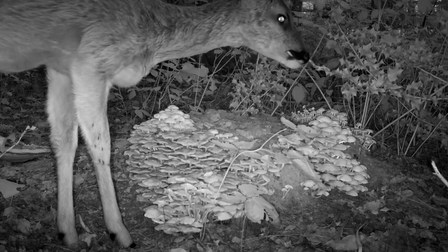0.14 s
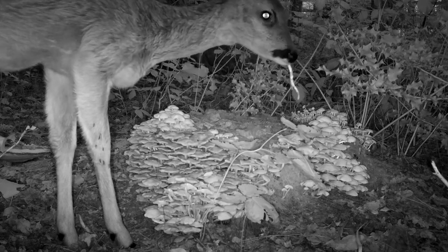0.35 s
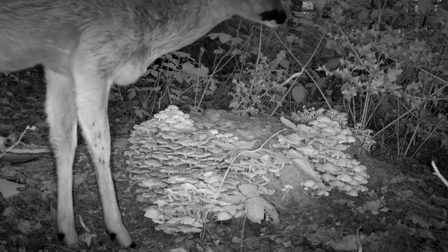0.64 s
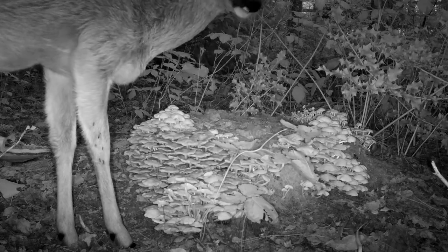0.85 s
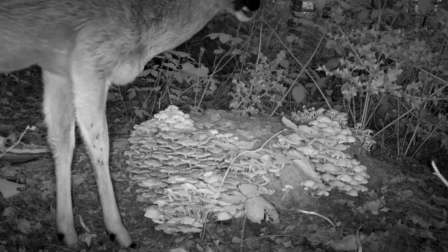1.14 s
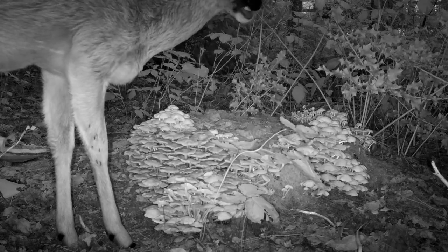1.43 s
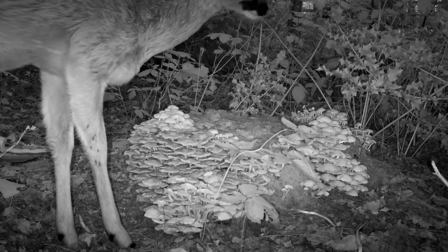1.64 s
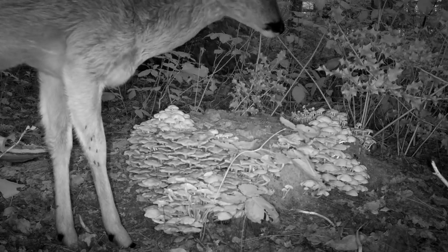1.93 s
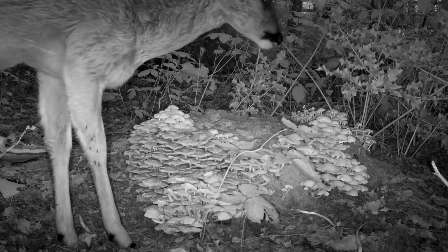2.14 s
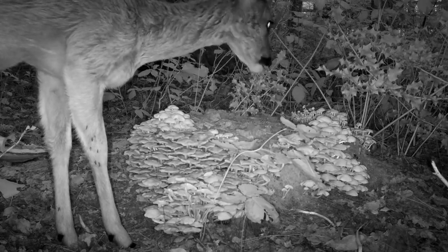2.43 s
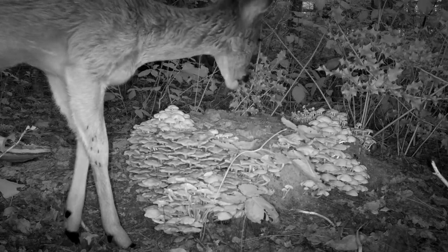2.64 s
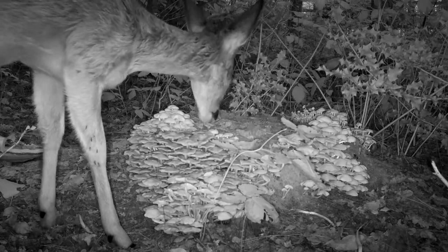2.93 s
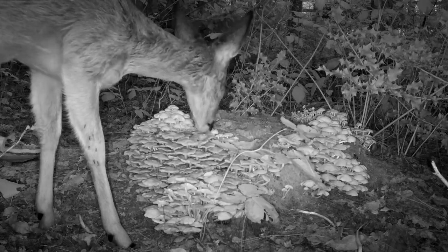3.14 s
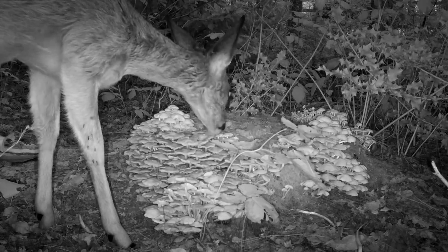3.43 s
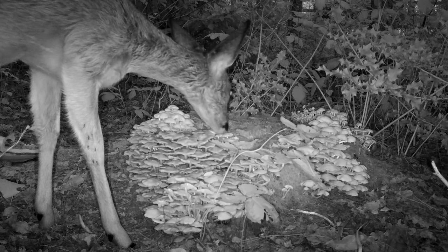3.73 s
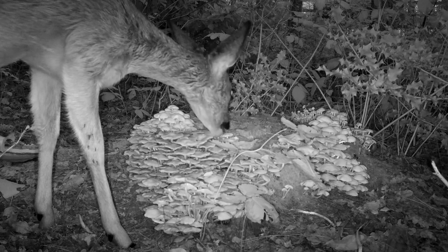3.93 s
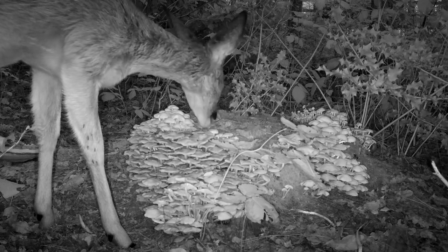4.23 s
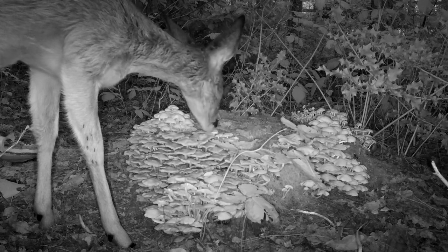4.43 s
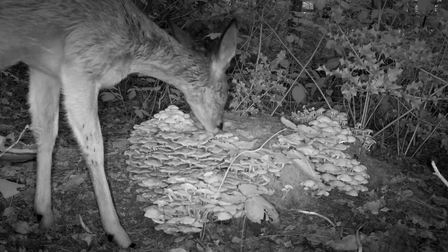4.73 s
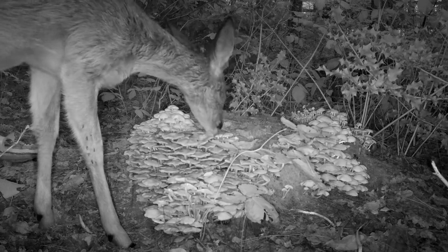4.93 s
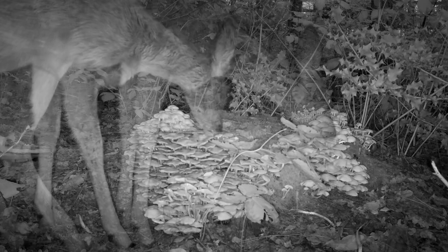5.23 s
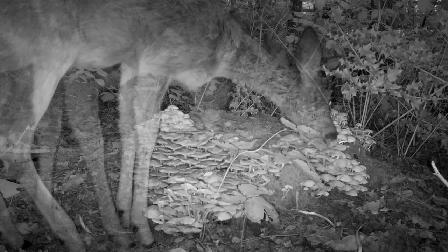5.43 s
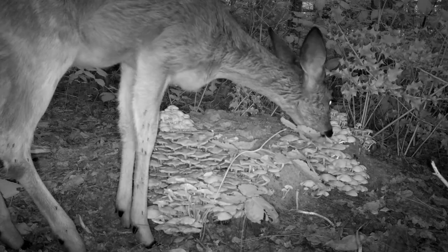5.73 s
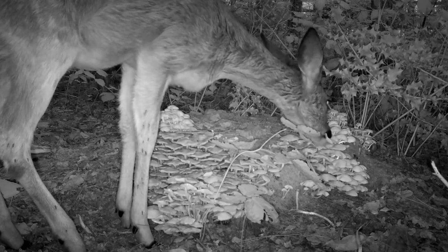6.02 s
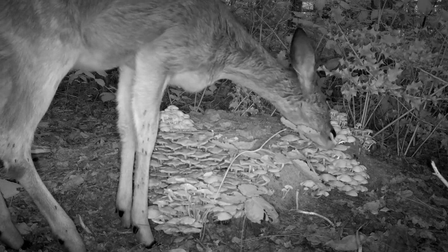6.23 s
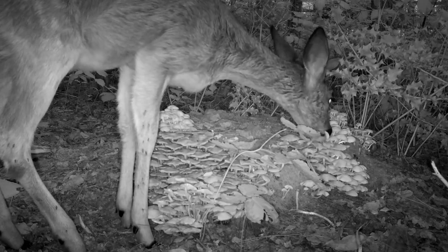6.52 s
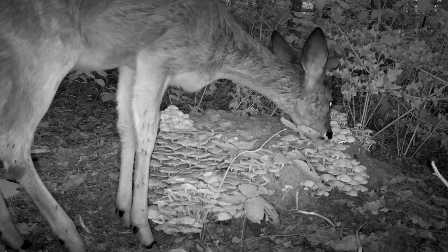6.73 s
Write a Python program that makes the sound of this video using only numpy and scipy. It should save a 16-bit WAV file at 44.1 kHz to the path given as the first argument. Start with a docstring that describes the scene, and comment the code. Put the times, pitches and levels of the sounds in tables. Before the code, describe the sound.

A small animal rattles shrilly, then a deer crunches and snaps stalks in a forest, with faint squeaks over steady hiss.

```python
"""A forest at night, where a young deer feeds on mushrooms in front of a trail camera.
Its bites and steps snap and rustle: stalks, twigs and leaves break in runs of tiny cracks.
A small animal, perhaps a squirrel, scolds in a rattle of falling chips; squeaks and thin peeps,
perhaps a bird's, come mostly later. The trees scatter the chips and squeaks.
Under it all lie the camera's own hiss, hum and thin whine."""
import sys
import numpy as np
from scipy import signal
from scipy.fft import rfft, irfft, next_fast_len
from scipy.io import wavfile
from scipy.ndimage import uniform_filter1d

SR = 44100
rng = np.random.default_rng(int(sys.argv[2]) if len(sys.argv) > 2 else 0)


def master_out(mix):
    """Clip the mix to full scale and print it as 16-bit PCM to the path in sys.argv[1]."""
    frames = np.transpose(np.atleast_2d(mix))
    ceiling = np.clip(frames, -1, 1)
    pcm = np.round(ceiling * 32767).astype(np.int16)
    wavfile.write(sys.argv[1], SR, pcm)


N = 302526
TIME = np.arange(N) / SR


def amp(db):
    """Decibels to gain."""
    return 10 ** (np.asarray(db) / 20)


def unit(x):
    """Scale to rms 1."""
    return x / np.sqrt(np.mean(x ** 2) + 1e-20)


def lookup(points, x):
    """Interpolate a table on a linear axis."""
    return np.interp(x, *np.transpose(points))


def lookup_hz(points, hz):
    """Interpolate a table on a log frequency axis."""
    f, value = np.transpose(points)
    return np.interp(np.log(hz + 1), np.log(f + 1), value)


def add(mix, start_s, sound):
    """Mix a sound in at start_s."""
    start = round(start_s * SR)
    sound = sound[max(-start, 0):]
    part = mix[max(start, 0):][:len(sound)]
    part += sound[:len(part)]


def wander(size, hz):
    """Smooth random curve, rms 1, bandwidth about hz."""
    f = np.fft.rfftfreq(size, 1 / SR)
    return unit(irfft(rfft(rng.standard_normal(size)) * np.exp(-(f / hz) ** 2), size))


def coloured(x, spectrum, treble_db=0, ring_hz=1, ring_db=0, ring_octaves=.19):
    """Minimum-phase filter: spectrum, treble shelf and one resonance."""
    hz = np.fft.rfftfreq(1024, 1 / SR)
    db = lookup_hz(spectrum, hz) + treble_db * np.clip((hz - 5000) / 4000, 0, 1)
    db += ring_db * np.exp(-(np.log2((hz + 1) / ring_hz) / ring_octaves) ** 2)
    log_gain = np.log(amp(np.r_[db, db[-2:0:-1]]))
    response = np.fft.ifft(np.exp(np.conj(signal.hilbert(log_gain)))).real
    return signal.fftconvolve(x, response)


def noise(spectrum, patchy_db, size=1024, patch_s=.11, patch_hz=260):
    """Shaped noise, rms 1; its level drifts by patchy_db in time-frequency patches."""
    hz = np.fft.rfftfreq(size, 1 / SR)
    hop = size // 4
    real, imag, patches = rng.standard_normal((N // hop + 6, len(hz), 3)).T
    patches = uniform_filter1d(patches, size=round(patch_s * SR / hop), axis=1)
    patches = unit(uniform_filter1d(patches, size=round(patch_hz / hz[1]), axis=0))
    depth_db = np.interp(np.arange(real.shape[1]) * hop / SR, TIME, patchy_db * np.ones(N))
    bins = (real + 1j * imag) * amp(lookup_hz(spectrum, hz)[:, None] + depth_db * patches)
    return unit(signal.istft(bins, nperseg=size, noverlap=size - hop)[1][:N])


def hiss():
    """Camera hiss; near 4.8 s it drops, dulls and swirls more."""
    # freq_hz, density_db
    spectrum = [(200, -52), (450, -47), (650, -18.5), (900, -18.5), (1250, -1), (1850, 4), (2700, -1.5),
                (3200, -8.5), (4000, -15), (4900, -20.5), (6000, -33), (7200, -43.5), (10000, -46.5),
                (15500, -39)]
    # time_s, gain_db
    gain_db = [(0, 2), (4.815, -0.5), (4.829, -10), (4.9, -5), (5.01, -9), (5.07, -4), (6.7, -4.5),
               (6.86, -10.5)]
    # time_s, gain_db
    treble_db = [(4.81, 8.5), (4.84, -3.5), (5.02, 2.5), (5.07, 3)]
    # time_s, depth_db
    swirl_db = [(4.8, .8), (4.85, 2.7)]
    base = noise(spectrum, patchy_db=lookup(swirl_db, TIME))
    treble = signal.sosfiltfilt(signal.butter(4, 3000, "high", fs=SR, output="sos"), base)
    shelved = base + (amp(lookup(treble_db, TIME)) - 1) * treble
    return amp(-55.5 + lookup(gain_db, TIME)) * shelved


def electronics(frame_hz=29.7, whine_hz=7797):
    """Camera fizz, rumble, hum and a whine that flips over with every picture taken."""
    # freq_hz, density_db
    fizz_spectrum = [(1000, -18.5), (5000, 5.5), (15500, 6)]
    # freq_hz, density_db
    rumble_spectrum = [(15, -6.5), (40, -0.5), (80, -1.5), (170, -2), (240, -7.5), (330, -19), (500, -24),
                       (1000, -59)]
    fizz = amp(-91) * noise(fizz_spectrum, patchy_db=0)
    rumble_db = np.interp(TIME, [2.5, 5], [-74.3, -76])
    rumble = amp(rumble_db) * noise(rumble_spectrum, patchy_db=.5, size=4096)
    hum = amp(-78.5) * np.sin(2 * np.pi * 2 * frame_hz * TIME)
    flip = .37 + np.tanh(9 * np.sin(2 * np.pi * frame_hz * TIME))
    whine_gain = amp(np.interp(TIME, [4, 4.9, 5.25], [-74, -79, -89]))
    whine = whine_gain * flip * np.sin(2 * np.pi * whine_hz * TIME)
    return fizz + rumble + hum + whine


def swirling_hiss():
    """Faint, patchy, swirling camera hiss from about 5 s on."""
    # freq_hz, density_db
    spectrum = [(600, -38), (1400, -6.5), (2200, 4.5), (4000, -10), (5500, -22), (7500, -32.5),
                (15000, -43)]
    # time_s, level_db
    level_db = [(5.0, -83), (5.08, -63.5), (6.8, -66.5)]
    return amp(lookup(level_db, TIME)) * noise(spectrum, patchy_db=3)


def forest(x, near_db, far_db):
    """Ground and near trunks reflect at once; farther trees leave a thin tail."""
    # freq_hz, t60_s
    t60_s = [(1800, 0.33), (2800, 0.47), (4500, 0.75), (7000, 0.53), (12000, 0.27)]
    t = np.arange(SR) / SR
    far = rng.standard_normal(SR) * (rng.random(SR) < 2500 / SR) * np.clip(t / .0044, 0, 1)
    hz, delay_s, bins = signal.stft(far, SR, nperseg=256)
    decay = amp(-60 * delay_s / lookup_hz(t60_s, hz)[:, None])
    far = signal.istft(bins * decay, SR, nperseg=256)[1][:SR]
    near = rng.choice([-1., 1.], SR) * (rng.random(SR) < 900 / SR) * np.exp(-t / .009) * (t > .002)
    echoes = amp(near_db) * near / np.linalg.norm(near) + amp(far_db) * far / np.linalg.norm(far)
    return signal.fftconvolve(x, echoes)[:N]


def scatter(x, near_db, far_db, blur_hz, count=6):
    """An even wash: several paths through the trees, each shifted a little in pitch."""
    analytic = signal.hilbert(x, next_fast_len(N))[:N]
    shifts_hz = np.linspace(-blur_hz, blur_hz, count)
    paths = [(analytic * np.exp(2j * np.pi * hz * TIME)).real for hz in shifts_hz]
    return sum(forest(path, near_db, far_db) for path in paths) / np.sqrt(count)


def sizzle(calls):
    """Faint treble noise that follows the shrillest part of the calls."""
    # freq_hz, density_db
    spectrum = [(4000, -37), (7000, 0), (9000, -8), (10500, -1), (12000, -13), (14000, -22.5), (15500, -13)]
    shrill = signal.sosfilt(signal.butter(4, 3700, "high", fs=SR, output="sos"), calls)
    shrill_rms = np.sqrt(abs(uniform_filter1d(shrill ** 2, size=2000)))
    return amp(-37) * shrill_rms * noise(spectrum, patchy_db=1.5)


def voice(hz, rough, overtone_db):
    """Tone with one overtone; roughness shakes its pitch and strength."""
    phase = 2 * np.pi * np.cumsum(hz * (1 + .064 * rough * wander(len(hz), 590))) / SR
    tone = np.sin(phase) + amp(overtone_db) * np.sin(2 * phase)
    return unit(tone * (1 + rough * np.tanh(wander(len(hz), 450))))


def whistles(notes, roughness, taper, bend):
    """Short gliding tones; bend < 1 glides early, taper is the share spent swelling and fading."""
    out = np.zeros(N)
    for start_s, length_s, first_hz, last_hz, level_db in notes:
        progress = np.linspace(0, 1, round(length_s * SR))
        hz = first_hz + (last_hz - first_hz) * progress ** bend
        tone = voice(hz, lookup_hz(roughness, last_hz), overtone_db=-50)
        add(out, start_s, amp(level_db) * signal.windows.tukey(len(hz), taper) * tone)
    return out


def peeps():
    """Thin whistles, most of them distant; the first is a faint high tone that rides with the chips near 0.7 s.
    The highest are the purest."""
    # start_s, length_s, first_hz, last_hz, level_db
    notes = [(.7, 0.056, 4670, 4730, -57.5), (3.36, .095, 7200, 7150, -83.5), (3.66, .095, 7230, 7200, -81),
             (3.685, 0.099, 3650, 4010, -56), (3.89, .095, 7120, 7080, -79),
             (3.9, 0.096, 3986, 3900, -53.5), (4.24, 0.1, 2610, 2440, -51), (4.35, 0.12, 2550, 2600, -58),
             (6.1, 0.14, 3700, 3730, -70), (6.725, 0.1, 3720, 3760, -62)]
    # pitch_hz, roughness
    roughness = [(2600, 0.6), (4000, 0.42), (7000, 0.06)]
    return whistles(notes, roughness, taper=.53, bend=2.1)


def squeaks():
    """Brief squeaks that spill into the trees; the highest are the most strained."""
    # start_s, length_s, first_hz, last_hz, level_db
    notes = [(0, 0.026, 4350, 4230, -25.5), (.066, .012, 4650, 4156, -27.5), (.117, .022, 4416, 4405, -27),
             (.242, 0.013, 5130, 3880, -25), (1.229, .011, 3760, 3500, -50),
             (3.943, 0.018, 4140, 3710, -48.5), (4.12, 0.037, 3770, 3440, -49.5),
             (4.1745, 0.016, 3910, 3780, -35.5), (4.2, .016, 3790, 3870, -43.5),
             (4.233, .023, 3980, 3350, -39.5), (4.282, .0266, 3580, 3090, -44.5),
             (4.335, 0.015, 3110, 2980, -43)]
    # pitch_hz, roughness
    strain = [(3000, 0.54), (3800, 0.16), (4300, 0.76)]
    # time_s, echo_send_db
    spill_db = [(.1, -.5), (4.18, -5.5), (4.28, -3)]
    direct = whistles(notes, strain, taper=.2, bend=.5)
    spill = direct * amp(lookup(spill_db, TIME))
    return direct + scatter(spill, near_db=-5.5, far_db=-2.5, blur_hz=140.1)


def rattle(land_hz=1785.6, crest_width_s=.001994):
    """Chips hook over a pitch crest and swell as they plunge; trees scatter them."""
    # crest_s, crest_hz, fall_s, gain_db
    chips = [(-.001, 3000, 0.013, -21.5), (0.067, 4000, .015, -25.5), (.122, 2904, 0.016, -25.5),
             (.194, 4100, .015, -25), (.247, 3100, .015, -24), (.332, 3108, .012, -25.5),
             (.395, 3465, .014, -20.5), (0.455, 3660, .012, -22.5), (.534, 2767, .012, -21),
             (.613, 2713, 0.01, -24.5), (.727, 2610, .013, -32.5), (0.796, 2800, 0.012, -27.5),
             (.883, 2750, 0.013, -22.5), (0.9858, 2590, .015, -20), (1.244, 2350, 0.013, -38.5)]
    # Chips get shorter and purer as the caller tires. time_s, half_length_s
    half_s = [(.25, 0.0092), (.46, 0.0054), (.56, 0.0043)]
    # time_s, overtone_db
    overtone_db = [(.13, -13), (.4, -28), (.8, -38)]
    # Bright near 5 kHz, dull above. freq_hz, gain_db
    chip_colour = [(500, -35), (1150, -31.5), (1650, -4), (2400, -2), (4600, 4.5), (5400, 3.5), (6400, -7),
                   (7500, -44.5), (12000, -50)]
    # time_s, echo_send_db
    spill_db = [(.6, 0), (1.0, -7.5)]
    out = np.zeros(N)
    for crest_s, crest_hz, fall_s, gain_db in chips:
        t = np.arange(-fall_s, 1.3 * fall_s, 1 / SR)
        arc_s = np.hypot(t, crest_width_s) - crest_width_s
        fallen = arc_s / (np.hypot(fall_s, crest_width_s) - crest_width_s)
        hz = crest_hz * (land_hz / crest_hz) ** fallen
        from_peak = t / lookup(half_s, crest_s) - 1.07
        swell = (1 + from_peak ** 2 / 2) ** -2 * signal.windows.tukey(len(t), .3)
        chip = voice(hz, rough=.28, overtone_db=lookup(overtone_db, crest_s))
        rasp = amp(-13) * chip * wander(len(t), 750)  # the uneven voice smears each sweep
        add(out, crest_s - fall_s, amp(gain_db) * swell * (chip + rasp))
    direct = coloured(out, chip_colour)[:N]
    spill = direct * amp(lookup(spill_db, TIME))
    return direct + scatter(spill, near_db=-5.5, far_db=-5, blur_hz=239.5)


def rustle(peak_s, half_s, level_db, treble_db, crisp_hz, cracks_per_s=3500):
    """Tearing: a swarm of tiny cracks swells and fades. Returns start_s, sound."""
    # freq_hz, gain_db
    spectrum = [(300, -59), (1200, -26.5), (1900, 2.5), (4400, 0.5), (5500, -4.5), (7800, -35),
                (9600, -9.5), (11000, -14.5), (12500, -33)]
    from_peak = np.arange(-3 * half_s, 3 * half_s, 1 / SR) / half_s
    size = len(from_peak)
    grains = rng.standard_normal(size) * (rng.random(size) < cracks_per_s / SR)
    swarm = unit(coloured(grains, spectrum, treble_db, crisp_hz, ring_db=7)[:size])
    return peak_s - 3 * half_s, amp(level_db) * swarm * np.exp(-abs(from_peak) ** 1.3)


def crack(treble_db, ring_hz, ring_db):
    """One fibre breaks: a click and a short splintering, peak 1."""
    # freq_hz, gain_db
    spectrum = [(300, -50), (1100, -47.5), (1700, -0.5), (3000, 0), (4500, 0), (5900, -8), (7700, -30),
                (10500, -21.5), (13000, -36), (15500, -52)]
    t = np.arange(SR // 50) / SR
    fracture = .36 * rng.standard_normal(len(t)) * np.exp(-t / .0008)
    fracture[0] = 1
    sound = coloured(fracture, spectrum, treble_db, ring_hz, ring_db)
    return sound / abs(sound).max()


def deer(splinter_gap_s=.0029):
    """Stalks and twigs snap in three ever weaker cracks, tearing nearby fibres; leaves rustle."""
    # start_s, peak_db, treble_db, ring_hz
    snaps = [(.543, -27, -12, 4500), (1.15, -43, -3, 4800), (2.776, -38.5, -12, 4350),
             (3.0718, -29, -6, 3300), (3.088, -19, 2, 3600), (3.0922, -25.5, 4, 3400),
             (3.197, -39.5, 6, 4040), (6.509, -43, -8.5, 4200), (6.529, -34.5, -7, 4340),
             (6.5391, -32, -12, 4370), (6.579, -34, -14, 3900), (6.584, -28, -6, 5240),
             (6.5985, -26, -18, 3230), (6.605, -19, -11, 4630), (6.608, -31, -16, 2570)]
    # Thin stalks ring more clearly than thick ones. peak_db, ring_db
    ring_db = [(-34.5, 11), (-24, 1)]
    # peak_s, half_length_s, level_db, treble_db, crisp_hz
    leaves = [(1.281, 0.025, -63.5, 3, 10100), (1.669, 0.024, -62, -6, 5030),
              (2.836, 0.027, -51, -6.5, 5000), (3.095, .016, -39.5, -1.5, 3660),
              (3.108, 0.051, -50.5, -4.5, 2640), (4.04, 0.044, -57, -14, 4700),
              (4.336, 0.073, -58, -9.5, 3300), (4.702, .045, -53, 0.5, 3500), (5.099, .02, -57, -18, 3900),
              (5.379, .032, -65.5, -9, 5850), (5.939, .021, -65, -9, 5200), (6.431, .025, -64.5, -9, 5400),
              (6.541, 0.018, -50.5, -6, 4320), (6.622, 0.04, -51, -14, 2390)]
    out = np.zeros(N)
    for start_s, peak_db, treble_db, ring_hz in snaps:
        step_db = np.interp(peak_db, [-25, -17], [-15, -8])  # harder snaps run on longer
        for k in range(3):
            delay_s = k * splinter_gap_s * rng.uniform(.88, 1.12)
            splinter = crack(treble_db, ring_hz, lookup(ring_db, peak_db))
            add(out, start_s + delay_s, amp(peak_db + k * step_db) * splinter)
        tear = rustle(start_s + .005, half_s=.02, level_db=peak_db - 32.5,
                      treble_db=treble_db - 5, crisp_hz=ring_hz)
        add(out, *tear)
    for row in leaves:
        add(out, *rustle(*row))
    return out + forest(out, near_db=-12, far_db=-22)


def scene():
    """Mono mix: callers off among the trees, the deer close by."""
    calls = rattle() + squeaks()
    background = hiss() + electronics() + swirling_hiss()
    return (background + peeps() + sizzle(calls) + calls + deer())[None]


def record(dry):
    """The camera's band limit."""
    lowpass = signal.firwin(511, 15750, window=("kaiser", 9), fs=SR)
    return signal.oaconvolve(dry, lowpass[None], "same")


dry = scene()
out = record(dry)
master_out(out)
```